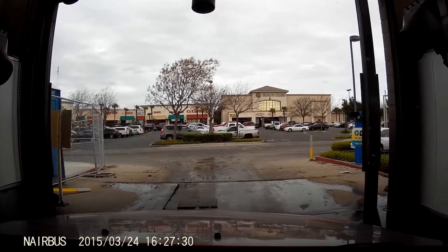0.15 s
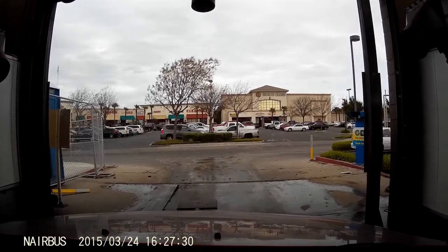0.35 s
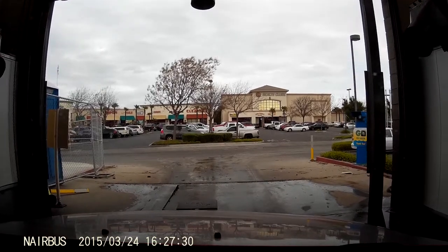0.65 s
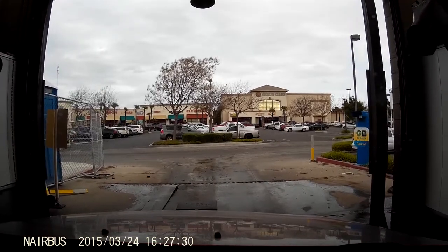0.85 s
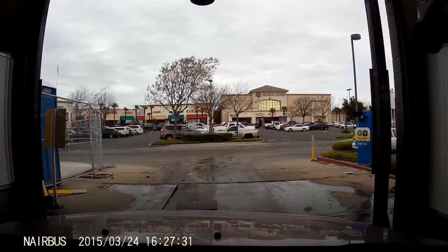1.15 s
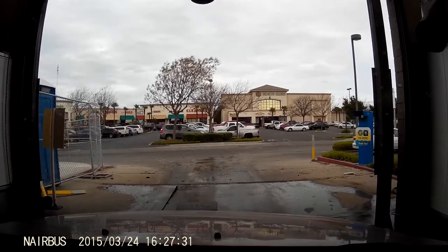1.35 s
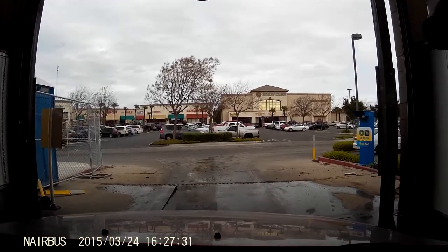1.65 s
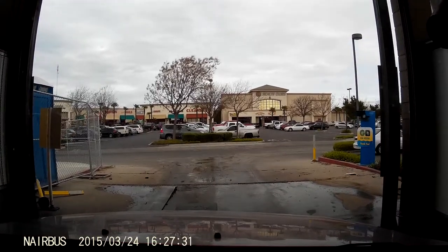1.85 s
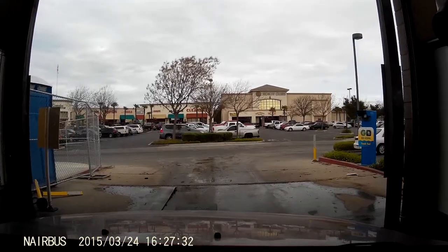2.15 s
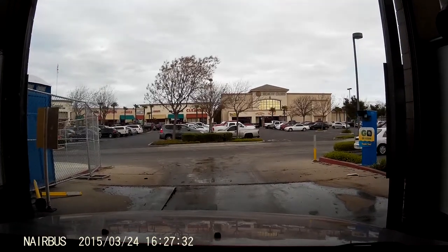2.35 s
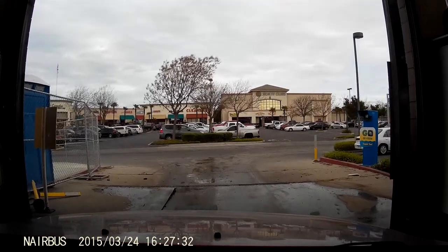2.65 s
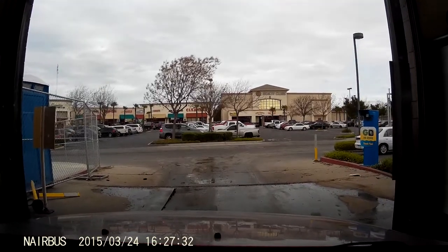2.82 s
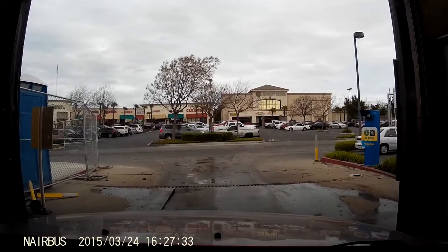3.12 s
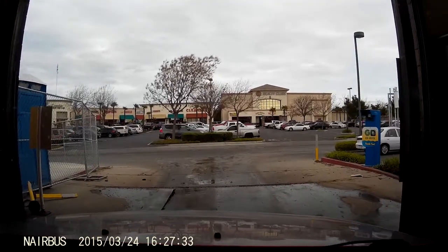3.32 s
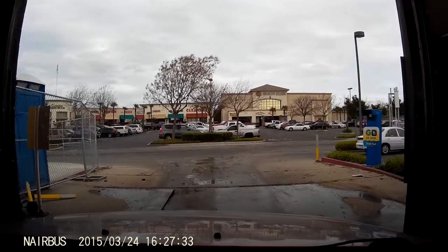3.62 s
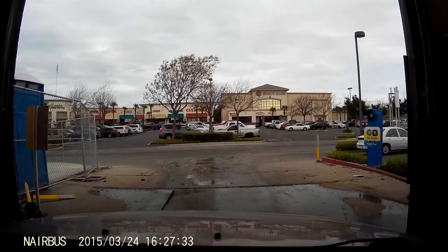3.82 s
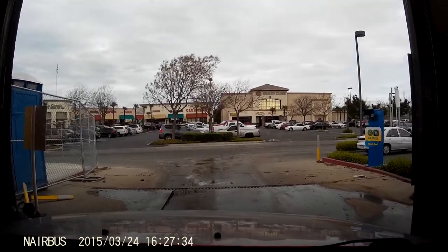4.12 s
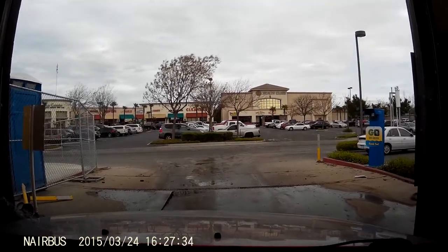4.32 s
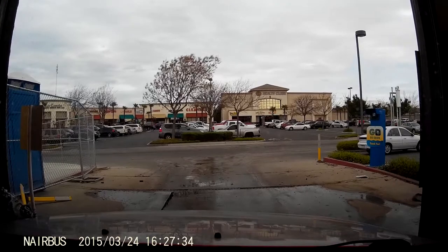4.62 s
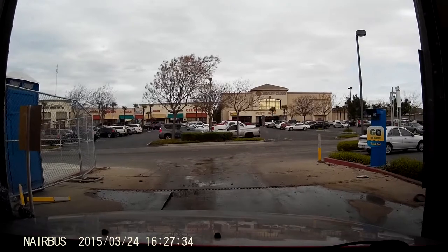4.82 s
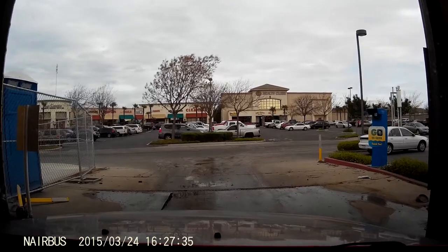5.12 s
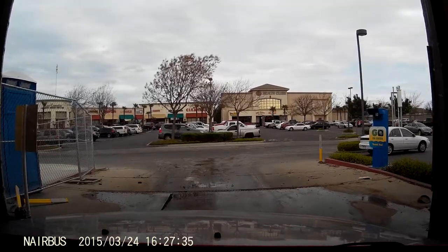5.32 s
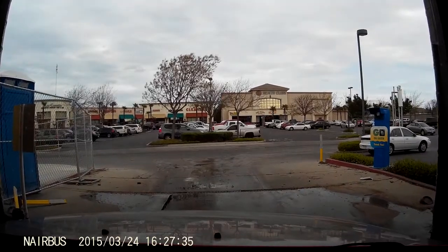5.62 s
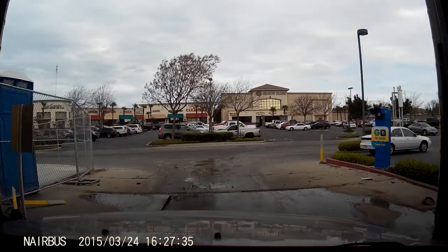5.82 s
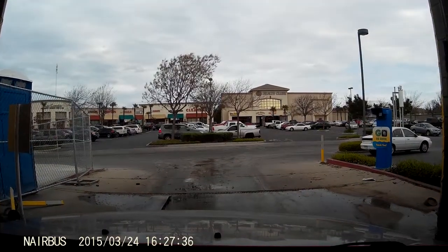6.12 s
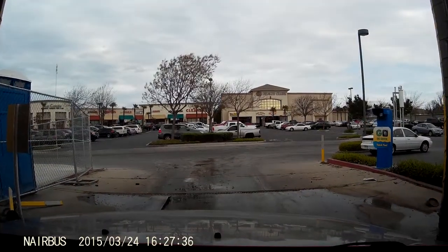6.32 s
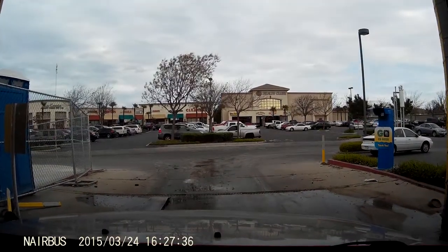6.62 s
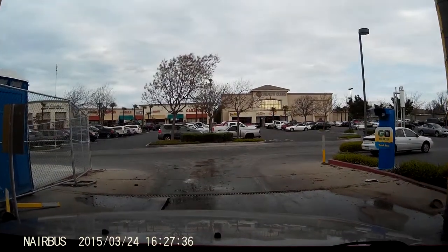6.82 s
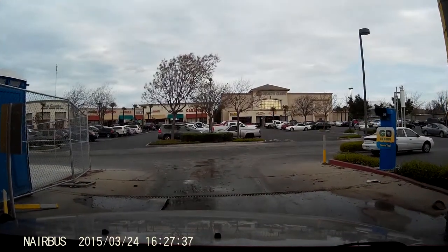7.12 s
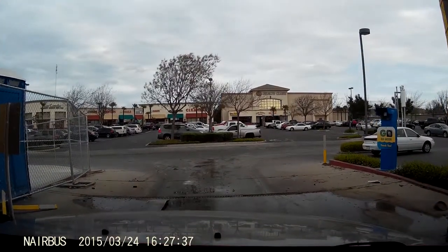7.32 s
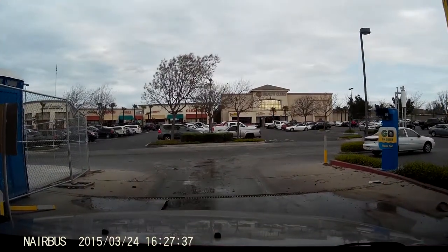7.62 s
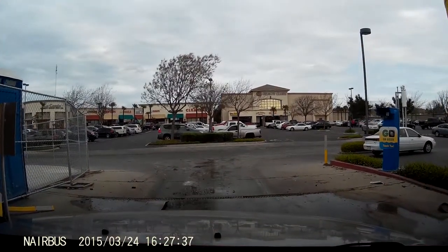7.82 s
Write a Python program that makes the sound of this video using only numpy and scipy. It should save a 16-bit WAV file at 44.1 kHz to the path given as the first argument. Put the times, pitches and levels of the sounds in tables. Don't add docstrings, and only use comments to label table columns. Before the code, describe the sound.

From inside a car creeping out of a wash tunnel, dryer blowers make a continuous broad roar with deep boom, rush and leaking hiss. A plastic camera mount close to the microphone creaks in tiny crackling bursts, busy in the first second, sparse afterward, then densest around five to six seconds, ending in a hard snap with a low glass knock. A very faint high whine runs throughout.

```python
import sys
import numpy as np
from scipy import signal
from scipy.io import wavfile
from scipy.ndimage import uniform_filter1d

SR = 44100
rng = np.random.default_rng(int(sys.argv[2]) if len(sys.argv) > 2 else 0)


def gain_from_decibels(decibels):
    exponent = np.asarray(decibels, float) / 20
    return 10 ** exponent


def unload_audio(sound):
    columns = np.transpose(np.atleast_2d(sound))
    steps = np.round(np.clip(columns, -1, 1) * 32767)
    wavfile.write(sys.argv[1], SR, steps.astype(np.int16))


N = 351036


def air():
    # frequency in Hz, density in dB per Hz.
    boom = [(7.1, -38), (12, -15), (43, 1), (86, -12.5), (110, -6.5), (140, -14), (240, -120)]
    roar = [(41, -13), (70, 0), (199, 3.5), (257, -13), (290, -9.5), (380, -22), (640, -120)]
    rush = [(130, -50), (220, 1.5), (263, -8), (361, -3), (399, -4), (647, -10), (795, -30.5), (900, -26.5),
            (1170, -56), (1980, -120)]
    leak = [(410, -21), (700, 1), (795, -5), (1320, -4.5), (1730, -16), (2260, -13), (3180, -20.5),
            (4000, -29.5), (4900, -32), (7180, -40.5), (8050, -43), (8470, -42), (13000, -47.5),
            (13700, -44), (14600, -96)]
    # frequency in Hz, width in Hz, gain in dB.
    cabin = [(62.4, 64, -1), (349.4, 43, 3.5), (630, 29, 1), (976, 160, 3.5), (1300, 110, 1),
             (2180, 540, 1.5), (2690, 44, 5.5), (3220, 290, 8), (3650, 200, 3.5), (4760, 93, 10.5),
             (5660, 130, -19), (6700, 150, 1), (11500, 600, -0.5)]
    # time in seconds, deepest bass added in dB.
    buffet = [
        (0, 4),
        (1, 2),
        (2, -2.5),
        (3.8, -6.5),
        (4.2, 0),
        (6.5, 1),
        (7.96, -13),
    ]
    hop = 512
    frames, hz = N // hop + 5, np.fft.rfftfreq(2048, 1 / SR)
    t = np.arange(frames) * hop / SR
    power = 0
    for shape, layer_db in zip((boom, roar, rush, leak), jets(t)):
        gain = gain_from_decibels(read(shape, hz))
        power = power + np.outer(gain ** 2 / np.sum(gain ** 2), gain_from_decibels(2 * layer_db))

    real, imaginary, patches = rng.standard_normal((frames, 1025, 3)).T
    patches = uniform_filter1d(patches, size=15, axis=0)
    patches = evened(uniform_filter1d(patches, size=6, axis=1))
    drift = rng.standard_normal((frames, 1025)).T
    drift = uniform_filter1d(drift, size=14, axis=0)
    drift = evened(uniform_filter1d(drift, size=70, axis=1))
    flutter = evened(uniform_filter1d(rng.standard_normal(frames), size=3))
    turbulence_db = 0.78 * drift + 0.32 * patches + 0.91 * flutter

    cabin_db = sum(db / (1 + (2 * (hz - f) / width) ** 2) for f, width, db in cabin)
    cabin_db = cabin_db - 40 * (hz > 13620)
    bass_share = 1 / (1 + (hz / 48) ** 6)
    buffet_db = np.outer(bass_share, np.interp(t, *np.transpose(buffet)))
    colour = gain_from_decibels(cabin_db[:, None] + buffet_db + turbulence_db)
    z = (real + 1j * imaginary) * np.sqrt(power) * colour
    return gain_from_decibels(0.5) * signal.istft(z, nperseg=2048, noverlap=1536)[1][:N]


def jets(t):
    # time in seconds, force on the windscreen in dB,
    # place from 0 (front) to 1 (rear).
    nozzles = [(0, -2.5, 0), (.6, -2.5, 0.011), (1.4, -2.5, 0.3), (1.9, -3.5, 0.24), (2.5, -0.5, 0.48),
               (3.5, 0, 0.56), (4.6, 1, .5), (5.4, -1, 0.27), (6.1, -3, 0.57), (6.8, -0.5, 0.68),
               (7.4, -2, 0.89), (7.96, -4, 0.95)]
    # level in dB, share of the force, change front to rear in dB.
    layers = [
        (-30, 0.48, 19),
        (-21, -0.12, -2.5),
        (-22.5, 0.8, -5),
        (-34, 1.2, 0),
    ]
    # time in seconds, half length in seconds, rise in dB.
    gusts = [
        (5.442, 0.035, 4.5),
        (5.986, 0.054, 2.5),
        (6.863, .1, 0.5),
        (7.658, 0.048, 4),
    ]
    s, force_db, place = np.transpose(nozzles)
    force_db, place = np.interp(t, s, force_db), np.interp(t, s, place)
    gust_db = sum(db * np.exp(-((t - at) / half) ** 2) for at, half, db in gusts)
    return [db + share * force_db + aft_db * place + gust_db for db, share, aft_db in layers]


def read(points, hz):
    f, value = np.transpose(points)
    return np.interp(np.log(hz + 1), np.log(f + 1), value, left=-90, right=-90)


def evened(x):
    return x / np.sqrt(np.mean(x ** 2) + 1e-20)


def creak(count=24):
    # time in seconds, peak in dB, brightness in dB.
    snaps = [(.2733, -33, -9), (.278, -28.5, -5), (.5842, -36, -5), (.6317, -27, -6), (0.7785, -29, -5),
             (0.955, -31, -11), (1.9708, -30, -19), (1.979, -29, -12), (3.4623, -31, -8), (3.603, -29, -18),
             (4.5637, -28, -14), (4.929, -28, -7), (4.9345, -32, -16), (5.0155, -28, -17), (5.116, -26, -8),
             (5.1651, -26.5, -7), (5.171, -26.5, -6), (5.188, -27, -5), (5.3335, -27, -8),
             (5.4574, -20, -13), (5.5, -27.5, -4), (5.527, -32, -3), (5.572, -26, -7), (5.582, -22.5, -15),
             (5.6749, -31, -8), (5.9475, -19, 4), (5.996, -30.5, -3), (6.043, -27, -13), (6.9657, -31, -9),
             (7.9397, -31.5, -4)]
    # time in seconds, peak in dB.
    ticks = [(1.01, -37), (1.0399, -38), (1.38, -35), (1.4744, -39), (1.663, -31), (2.1405, -33),
             (2.1444, -30), (2.336, -32.5), (2.6995, -37), (2.9697, -36), (3.081, -31.5), (3.2133, -32),
             (3.265, -32), (3.8981, -36), (4.1883, -36), (4.4541, -31), (4.6214, -29), (4.7708, -32),
             (4.8134, -34), (5.4205, -30), (5.81, -30), (5.8944, -36), (6.2641, -34), (6.4153, -30),
             (6.5482, -37), (6.8097, -36), (7.2692, -35), (7.306, -35), (1.9375, -31), (7.3864, -32)]
    # mode in Hz, level in dB, t60 in seconds.
    mount_dull = [(2220, -1.5, 0.016), (3070, -3.5, 0.0098), (3664, -3, 0.022), (4310, -4.5, 0.015),
                  (4975, 0, 0.012), (5516, 0, 0.019), (6030, -6, 0.0086), (6660, -8.5, 0.017),
                  (7430, -10, 0.0081), (7760, -13.5, .008)]
    mount_bright = [(7970, 2, 0.0046), (9070, -6, 0.0079), (9910, -1.5, 0.0053), (11040, -6, 0.0045),
                    (11350, -0.5, 0.0072), (12200, -12, .005), (13000, -1.5, 0.0045), (13800, -16, .005)]
    s, peak_db, bright_db = np.transpose(snaps + [(at, db, -18) for at, db in ticks])

    chance = rng.standard_normal((4000, 4))
    mean_gap_s = .0046
    small = np.cumsum(mean_gap_s * np.exp(.33 * chance[:, 0]))
    clear = abs(small[:, None] - s).min(1) > .0027
    keep = (small < N / SR - .01) & clear
    small_db = (strain(small) + 5.3)[keep]
    small_db += 1.5 * np.minimum(chance[keep, 1], 1.5)
    small_db += 2.2 * evened(uniform_filter1d(rng.standard_normal(4000), size=5))[keep]
    stray_db = -42.5 + 3.5 * chance[keep, 1] - 30 * (chance[keep, 3] < .75)
    lone = stray_db > small_db
    small_db = np.maximum(small_db, stray_db)
    small_bright_db = -19 - 0.36 * (small_db + 24) + 5.5 * chance[keep, 2] - 5 * lone

    at = (np.r_[s, small[keep]] * SR).astype(int)
    dull, bright = np.zeros(N), np.zeros(N)
    way = rng.choice([-1, 1], N)[at]
    dull[at] = gain_from_decibels(np.r_[peak_db + 4.1, small_db]) * way
    bright[at] = dull[at] * gain_from_decibels(0.8 * np.r_[bright_db, small_bright_db] - 1.0)
    variant, out = rng.integers(0, count, N), np.zeros(N)
    for k in range(count):
        dull_ring = scattered(struck(mount_dull, bite_s=.0005))
        bright_ring = scattered(struck(mount_bright))
        out += signal.oaconvolve(dull * (variant == k), dull_ring)[:N]
        out += signal.oaconvolve(bright * (variant == k), bright_ring)[:N]
    return out


def knock():
    # frequency in Hz, level in dB, t60 in seconds.
    glass = [
        (400, 0, .04),
        (700, -6, .02),
        (1120, -9, .02),
        (1300, -7, .025),
    ]
    at_s, knock_db = 5.9455, -10
    ring = gain_from_decibels(knock_db) * struck(glass, bite_s=.001, longest=.04)
    out = np.zeros(N)
    out[round(at_s * SR):][:len(ring)] += ring
    return out


def strain(t):
    # start in seconds, length in seconds, strain in dB.
    bursts = [(.188, 0.016, -36), (0.246, 0.035, -36), (0.336, 0.015, -37), (0.424, 0.064, -34.5),
              (0.54, .05, -36), (0.678, 0.074, -39.5), (.76, 0.061, -37), (.912, 0.035, -39.5),
              (1.965, 0.059, -34.5), (3.18, 0.12, -44.5), (3.445, 0.064, -35.5), (3.585, 0.035, -32.5),
              (3.651, 0.02, -33), (4.132, 0.016, -35), (4.53, 0.047, -37), (4.897, 0.048, -29),
              (5.003, 0.029, -36.5), (5.068, 0.12, -33), (5.223, 0.055, -34.5), (5.323, 0.046, -32),
              (5.455, 0.146, -31), (5.647, 0.043, -34), (5.93, 0.053, -33), (5.99, 0.063, -36),
              (6.123, 0.038, -37), (6.187, 0.032, -39), (6.96, 0.04, -38), (7.518, 0.17, -34.5),
              (7.881, 0.016, -38), (7.933, .03, -38)]
    grip_s, let_go_s, rest_db = .006, .03, -56
    start, length, db = np.transpose(bursts)[:, :, None]
    rise = (t - start) / grip_s + 1
    fall = (start + length - t) / let_go_s + 1
    hold = np.clip(np.minimum(rise, fall), 0, 1)
    return (rest_db + (db - rest_db) * hold).max(0)


def struck(modes, spread=.015, bite_s=.00015, longest=.011):
    t = np.arange(1500) / SR
    ring = 0
    for k, (hz, db, t60) in enumerate(modes):
        detune, load = rng.standard_normal(2)
        decay = gain_from_decibels(db + 2.2 * load - 60 * t / np.clip(t60, .002, longest))
        ring = ring + (-1) ** k * decay * np.sin(2 * np.pi * hz * (1 + spread * detune) * t)
    ring = ring * (1 - np.exp(-(t / bite_s) ** 2))
    return ring / abs(ring).max()


def scattered(ring, t60=.028, db=-9.5):
    t = np.arange(1500) / SR
    tail = rng.standard_normal(len(t)) * gain_from_decibels(-60 * t / t60) * (t > .0007)
    bounces = np.convolve(ring, tail / np.linalg.norm(tail))
    return np.append(ring, t[1:] * 0) + gain_from_decibels(db) * bounces


def whine():
    # time in seconds, whine level in dB rms.
    drifting = [
        (0, -68.5),
        (1.9, -68.5),
        (2.1, -65.5),
        (4.2, -66),
        (4.5, -67.5),
        (5.7, -67.5),
        (6, -70.5),
        (6.6, -68.5),
        (7.96, -71),
    ]
    whine_hz, flip_hz = 7932.6, 30.15
    t = np.arange(N) / SR
    flips = np.tanh(6 * np.sin(2 * np.pi * flip_hz * t))
    rms = gain_from_decibels(np.interp(t, *np.transpose(drifting)))
    return np.sqrt(2) * rms * flips * np.sin(2 * np.pi * whine_hz * t)


def scene():
    return (air() + creak() + knock() + whine())[None]


def low_pass(x):
    return signal.sosfilt(signal.butter(12, 14780, fs=SR, output="sos"), x)


def record(dry):
    power_db = 10 * np.log10(abs(uniform_filter1d(dry[0] ** 2, size=4000)) + 1e-12)
    held = dry / gain_from_decibels(0.32 * (power_db + 15))
    bass_cut = signal.butter(2, 22, "high", fs=SR, output="sos")
    held = signal.sosfilt(bass_cut, held)
    treble_limit = signal.firwin(63, 14600, window=("kaiser", 7), fs=SR)
    return low_pass(signal.oaconvolve(held, treble_limit[None], "same"))


dry = scene()
out = record(dry)
unload_audio(out)
```